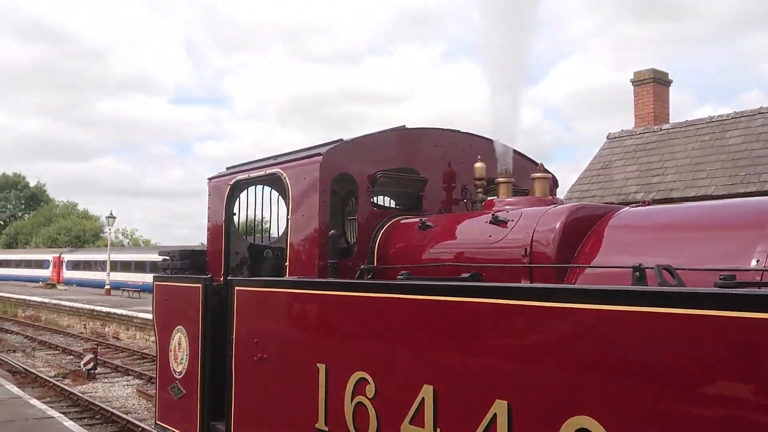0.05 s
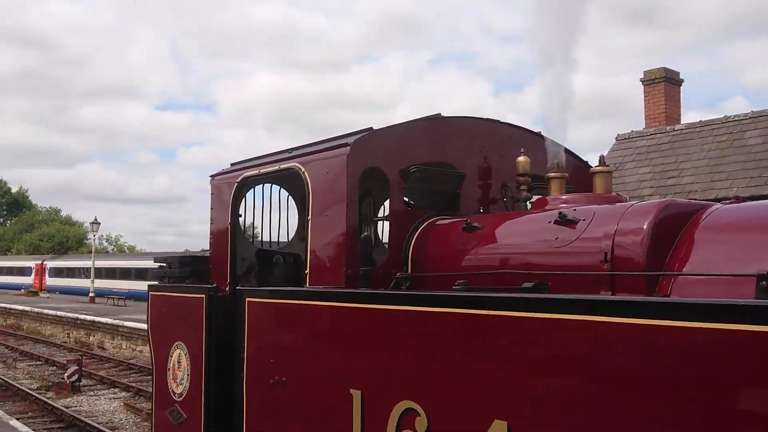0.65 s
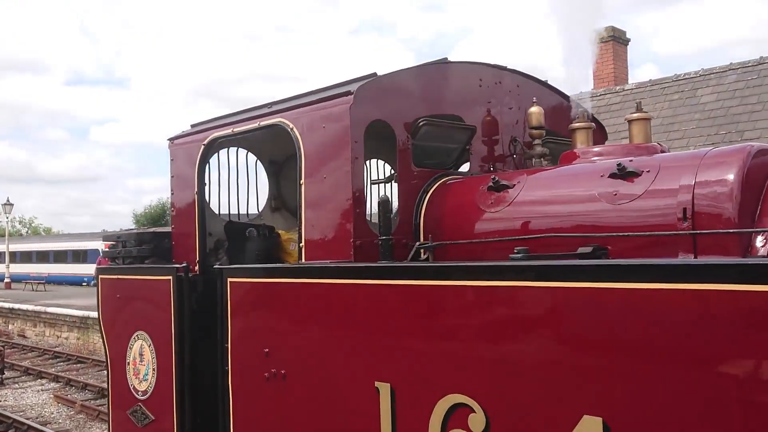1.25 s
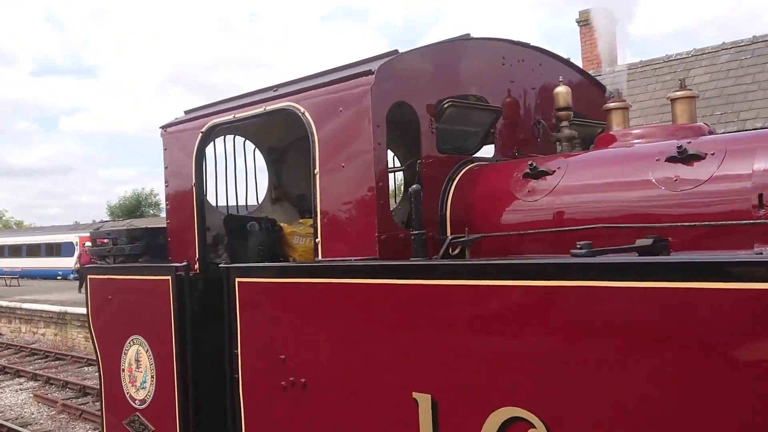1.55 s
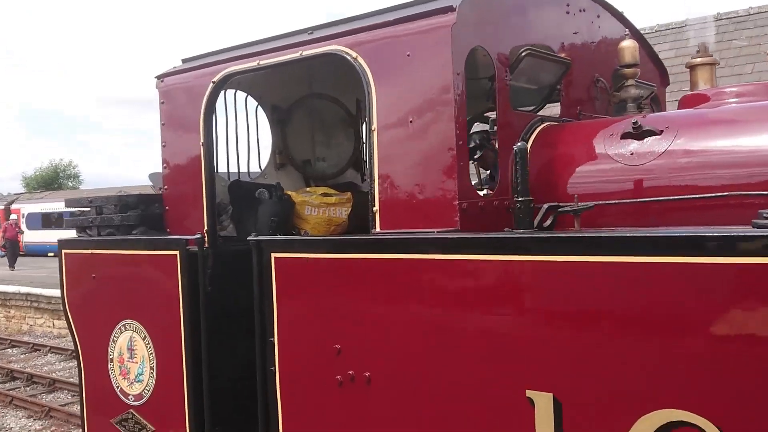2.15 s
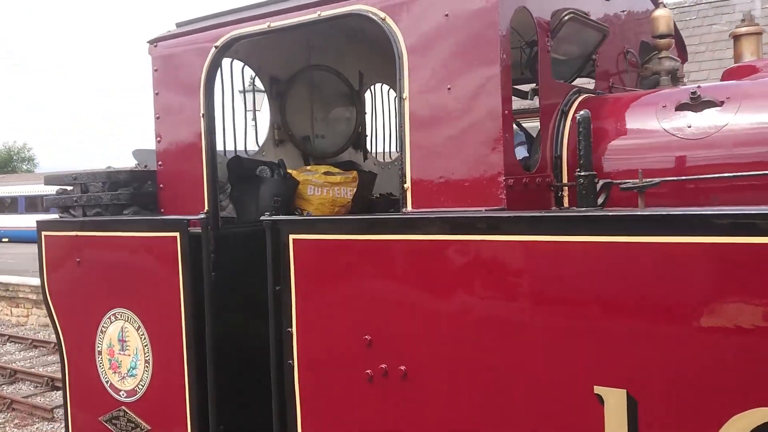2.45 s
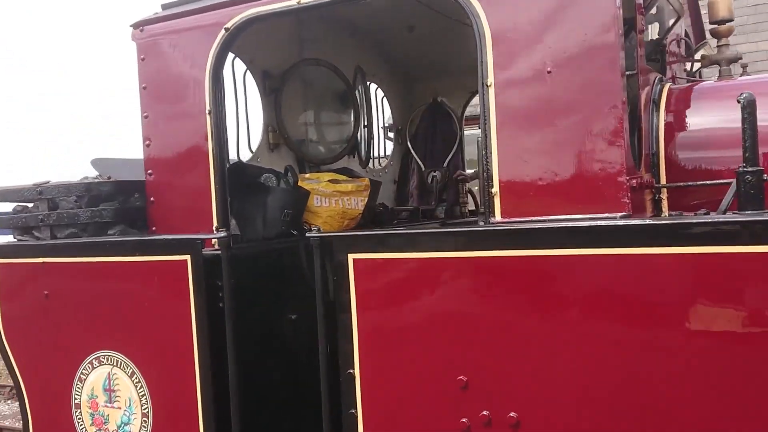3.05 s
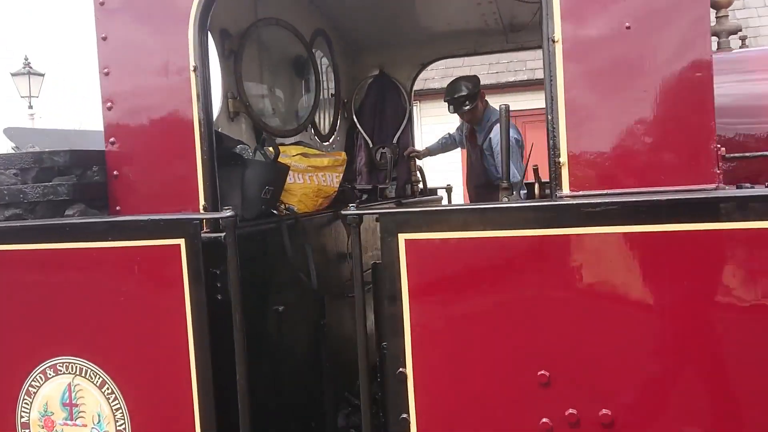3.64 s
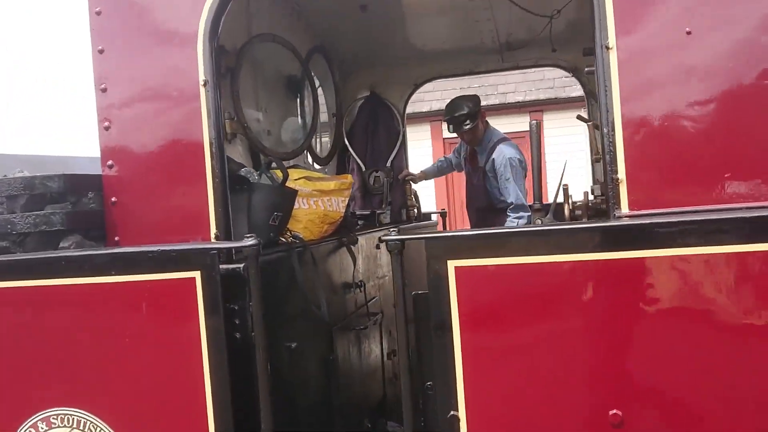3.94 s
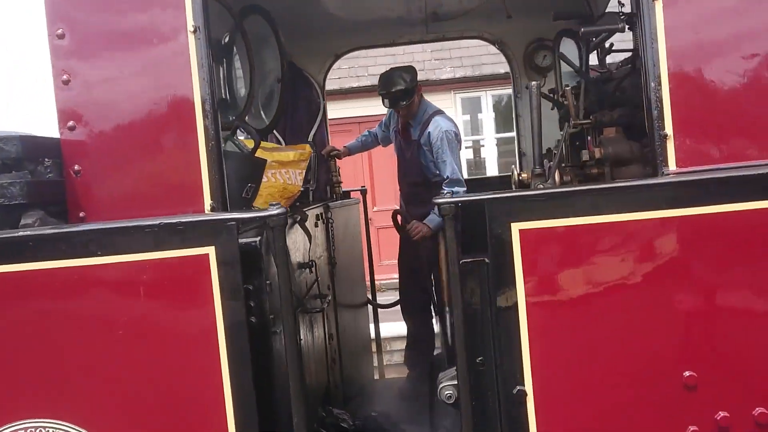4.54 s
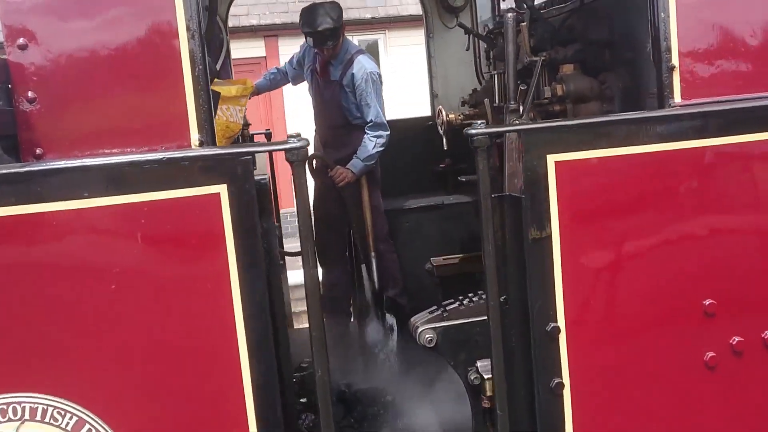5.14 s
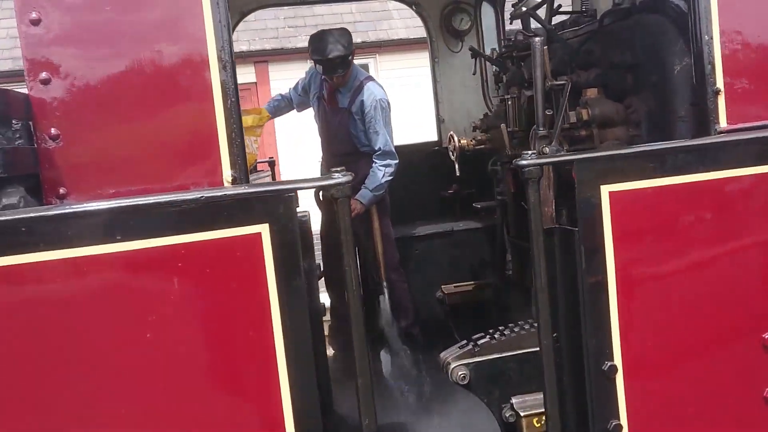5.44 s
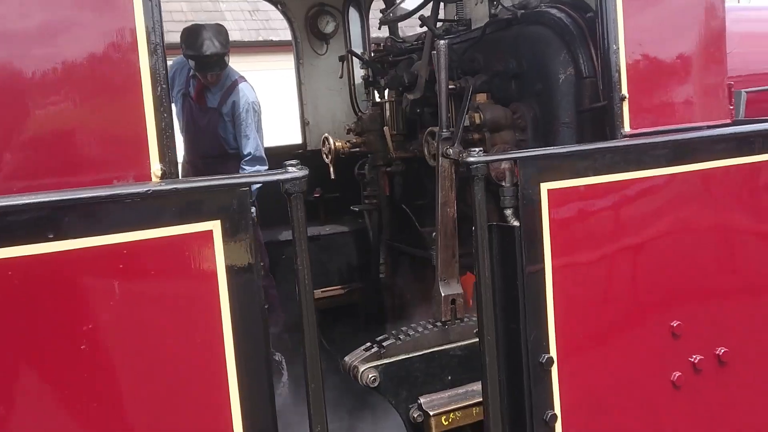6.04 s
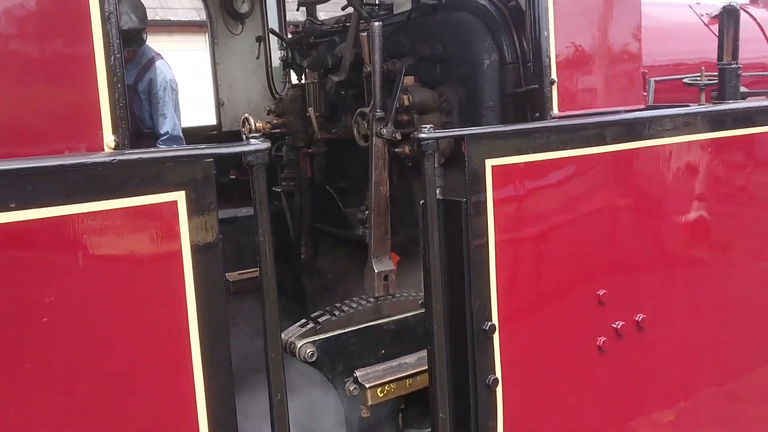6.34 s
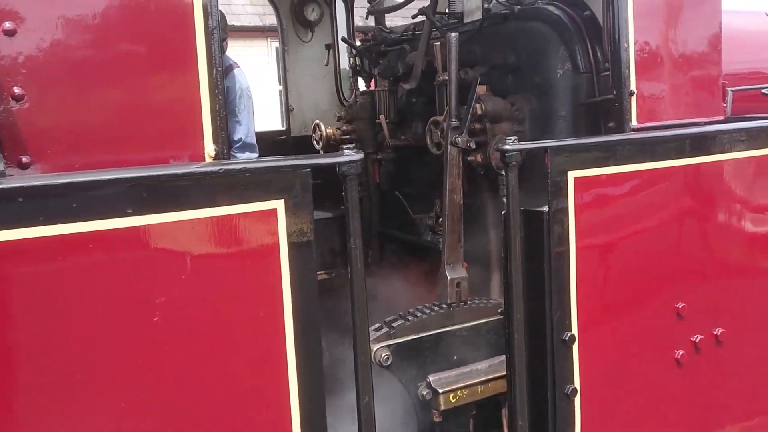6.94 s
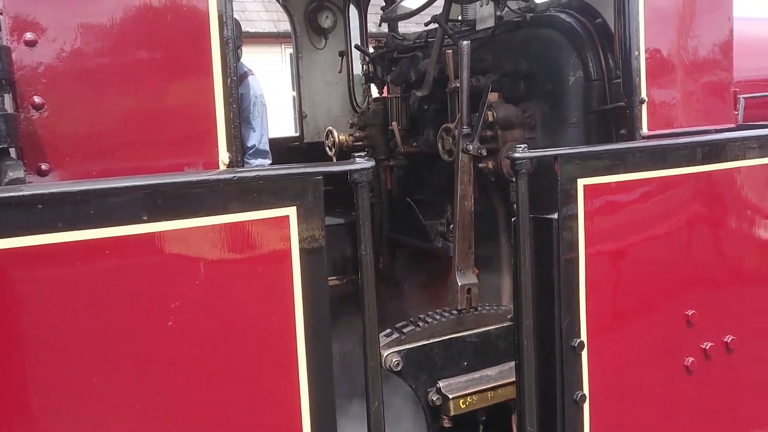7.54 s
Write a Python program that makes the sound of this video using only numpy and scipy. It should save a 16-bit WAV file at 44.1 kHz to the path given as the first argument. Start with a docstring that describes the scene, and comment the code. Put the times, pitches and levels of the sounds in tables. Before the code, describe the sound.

Steam hisses continuously from a locomotive's safety valves, joined about halfway by a lower rush of steam and water from the cab.

```python
"""A standing steam locomotive blows off its safety valves, heard on a hand-held stereo microphone.
From the first step the jet hisses over the firebox rumble, and a little wind touches the microphone.
On the walk to the cab, faint echoes comb the hiss, single bands swell or fade, and at times it whistles.
Near 4.6 s the doorway opens up a lower rush from the footplate and more of the fire. From about 6 s
the cab walls close in and ring, and the cab side half hides the rush while the valves blow on."""
import sys
import numpy as np
from scipy import signal
from scipy.fft import rfft, irfft, next_fast_len
from scipy.io import wavfile
from scipy.ndimage import uniform_filter1d

SR = 44100
rng = np.random.default_rng(int(sys.argv[2]) if len(sys.argv) > 2 else 0)


def to_wav(s):
    """Save 16-bit WAV."""
    ch = np.atleast_2d(s).T  # columns
    pcm = np.round(np.clip(ch, -1, 1) * 32767)  # PCM
    wavfile.write(sys.argv[1], SR, pcm.astype(np.int16))


N = 343539
PORT_GAP_M, EDGE_HZ = 0.06, 15790  # the microphone: distance between its two ports, top of its band
SOUND_M_PER_S = 343
DOOR_OPENS_S, DOOR_FADE_S = 4.6, 0.28  # the cab doorway comes into view


def gain_of(db):
    """Decibels to amplitude."""
    return 10 ** (np.asarray(db) / 20)


def port_column(pair):
    """A left and a right value, shaped to spread over time and frequency."""
    return np.array(pair)[:, None, None]


def grid(size):
    """Times (a column) and frequencies (a row) of short-time spectra."""
    hop = size // 4
    return np.arange(-(-N // hop) + 1)[:, None] * hop / SR, np.fft.rfftfreq(size, 1 / SR)


def curves(rows, t):
    """The columns of a timed table, read at the times t."""
    times, *columns = np.transpose(rows)
    return [np.interp(t, times, column) for column in columns]


def colour(points, hz):
    """A spectrum as gains, scaled to unit power below the band edge."""
    f, db = np.transpose(points)
    gain = gain_of(np.interp(np.log(hz + 1), np.log(f), db))
    return gain / np.sqrt(np.mean(gain ** 2 * (hz < EDGE_HZ)))


def bell(x, centre, half_width):
    """A smooth bump of height 1."""
    return np.exp(-((x - centre) / half_width) ** 2)


def fade_in(t, middle_s, half_s):
    """A smooth step from 0 to 1."""
    return (1 + np.tanh((t - middle_s) / half_s)) / 2


def wander(t, slow_hz, fast_hz, count=16):
    """Random drift of rms 1 between two rates."""
    rates = np.geomspace(slow_hz, fast_hz, count)
    waves = sum(np.sin(2 * np.pi * (r * t + rng.random())) / np.sqrt(r) for r in rates)
    return waves / np.sqrt(np.sum(1 / rates) / 2)


def patches(t, hz, frames, bins):
    """Smooth random field of rms 1 over time and frequency."""
    field = rng.standard_normal((len(t), len(hz)))
    for _ in range(2):
        field = uniform_filter1d(field, frames, axis=0)
        field = uniform_filter1d(field, bins, axis=1)
    return field / field.std()


def diffuse(hz, likeness=0.92):
    """Likeness at the two ports of sound that reaches the microphone from all sides."""
    return likeness * np.sinc(2 * hz * PORT_GAP_M / SOUND_M_PER_S)


def stereo_noise(gain, likeness, size):
    """Noise with a gain and a complex left-right likeness for each frame and bin."""
    framing = dict(nperseg=size, noverlap=size - size // 4)
    white = rng.standard_normal((2, N))
    right, unrelated = signal.stft(white, **framing)[2].transpose(0, 2, 1)
    left = likeness * right + np.sqrt(np.maximum(1 - abs(likeness) ** 2, 0)) * unrelated
    spectra = (np.array([left, right]) * gain).transpose(0, 2, 1)
    return signal.istft(spectra, **framing)[1][:, :N]


# wind right at the microphone: f/Hz, relative level/dB
WIND_SPECTRUM = [(20, -18), (60, -3), (130, -8.5), (220, -23), (500, -17), (2000, -60)]
# puffs on the way: t/s, half length/s, left level/dB, right level/dB
WIND_PUFFS = [(0.056, 0.03, -33, -60), (1.8, 0.3, -42.5, -45), (2.38, 0.07, -44, -58),
              (3.094, 0.18, -50, -43), (4.98, 0.09, -43, -47), (5.494, .09, -38, -39),
              (5.75, 0.09, -38, -41), (7.05, 0.067, -39, -49), (7.6, .18, -52, -49)]


def wind(size=2048, breeze_db=-53):
    """A faint breeze and soft puffs brush the microphone, unrelated at its two ports."""
    t, hz = grid(size)
    puffs = sum(port_column(gain_of(db)) * bell(t, s, half_s) for s, half_s, *db in WIND_PUFFS)
    return stereo_noise(colour(WIND_SPECTRUM, hz) * (gain_of(breeze_db) + puffs), 0, size)


# rumble of the firebox, from outside the cab: f/Hz, relative level/dB
FIRE_SPECTRUM = [(20, -34), (32, -26), (48, -11.5), (57, 3), (64, 5), (72, -1), (90, -5.5), (130, -19),
                 (400, -62)]
# the fire flares: t/s, half length/s, rise/dB
FIRE_FLARES = [(3.05, 0.14, 7), (5.75, 0.13, 7), (7.6, 0.5, 3)]


def firebox(size=8192, likeness=0.99, behind_tank_db=-49.5, doorway_db=-41, draught_db=0.5):
    """The draught through the fire booms in one low resonance, louder at the doorway."""
    _, hz = grid(size)
    t = np.arange(N) / SR
    level_db = behind_tank_db + (doorway_db - behind_tank_db) * fade_in(t, DOOR_OPENS_S, DOOR_FADE_S)
    level_db += sum(db * bell(t, s, half_s) for s, half_s, db in FIRE_FLARES)
    level_db += draught_db * wander(t, 1.6, 5.4, count=6)
    return stereo_noise(colour(FIRE_SPECTRUM, hz), likeness, size) * gain_of(level_db)


def cab_hollow(t, hz, spacing_hz=630, first_hz=60, cab_db=2.5, notch_hz=438, notch_db=-5.5):
    """Evenly spaced low resonances set in as the microphone nears the steel walls of the cab."""
    depth_db = cab_db * fade_in(t, 5.94, 0.26)
    ripple = np.cos(2 * np.pi * (hz - first_hz) / spacing_hz) * bell(hz, 950, 950)
    bounce_db = notch_db * bell(hz, notch_hz, 28)  # a bounce off the ground cancels one narrow band
    return gain_of(depth_db * ripple + bounce_db)


# the rush from the footplate: f/Hz, relative level/dB
RUSH_SPECTRUM = [(30.0, -20), (80.0, -12.5), (170.0, -0.5), (500.0, -3), (700, -2), (830, -3.5),
                 (1000, -5.8), (1300, -4.5), (2000.0, -5), (5000.0, -7.5), (15000.0, -50)]


def footplate(size=2048, far_db=-49, near_db=-42.3, doorway_db=-25.3, hidden_db=-30.5,
              surge_db=0.3, roar_db=4):
    """Steam and water rush over the footplate: far off at first, then close through the doorway."""
    t, hz = grid(size)
    level_db = np.interp(t, [0, DOOR_OPENS_S], [far_db, near_db])
    level_db += (doorway_db - near_db) * fade_in(t, DOOR_OPENS_S, DOOR_FADE_S)
    level_db += (hidden_db - doorway_db) * fade_in(t, 6.2, 0.04)  # the cab side half hides it
    level_db += surge_db * wander(t, 1.8, 14)
    # straight in front of the doorway the cab gives the rush a hollow roar
    roar = gain_of(roar_db * bell(t, 5.76, 0.3) * bell(hz, 760, 280))
    gain = colour(RUSH_SPECTRUM, hz) * gain_of(level_db) * roar * cab_hollow(t, hz)
    return stereo_noise(gain, diffuse(hz), size)


# colour of the hiss close to the cab walls: f/Hz, half width/Hz, left/dB, right/dB
CAB_BANDS = [(540, 45, 7.5, 6), (1350, 31, 5, 4.5), (1760, 89, 5, 2), (2020, 150, 3, -1),
             (2470, 350, -2, -5), (3400, 930, 1.5, -1), (4230, 170, 2.5, 2.2), (6300, 520, 0, -6),
             (8250, 650, 1, -2), (9250, 1200, 0.2, -4)]
# single bands of the hiss swell or fade for a while at each port:
# from t/s, to t/s, f/Hz, half width/Hz, left/dB, right/dB
HISS_BAND_SWELLS = [(-0.3, 1.83, 4200, 1900, -2.5, -0.8), (-0.3, 1.2, 13000, 2000, -2, -0.8),
                    (-0.3, 0.9, 15600, 900, 0, -3.5), (-0.3, 0.45, 1000, 70, -3, -4),
                    (-0.3, 2.4, 370, 70, -2, -1), (0.7, 1.37, 10600, 1500, -1, -3),
                    (1.45, 2, 10500, 1400, 2, 1), (1.7, 3.9, 730, 160, 1.5, 2),
                    (1.6, 2.8, 1150, 220, 3, 0.5), (1.9, 2.8, 4400, 1200, -0.7, -1.5),
                    (2.2, 2.95, 14800, 1700, 2, -1.5), (2.2, 2.75, 2400, 350, 0, -1.2),
                    (4.05, 4.6, 650, 200, -1.5, -2.5), (2.7, 4.3, 1060, 120, 3.5, 1),
                    (2.7, 4.4, 1490, 130, 6, 3.5), (3.35, 4.5, 15400, 900, 5, 3),
                    (3.7, 4.25, 4400, 2000, 2, 1), (4.4, 6.6, 13200, 800, -0.5, 3.5),
                    (5.7, 6.95, 14300, 2000, 1.5, 1), (5.95, 6.42, 13900, 1300, 1.5, 3),
                    (6.08, 6.9, 11700, 1200, 4.5, -1), (6.42, 6.95, 8900, 600, 2.8, 1.2),
                    (6.3, 7, 5440, 700, -2, -2.5), (6.4, 7.0, 9900, 400, -3, -1),
                    (6.4, 7.0, 11400, 1100, -1.5, -1.5), (6.68, 7.2, 12100, 1190, 2, 0),
                    (6.9, 8.1, 2780, 130, -1, -3), (6.9, 7.4, 3220, 160, 3, 1),
                    (7.0, 8.1, 14600, 1100, 1.5, 1.5), (7.0, 7.8, 10300, 1300, 0.5, -1.5),
                    (7.05, 8.1, 12600, 550, -1, -3.5), (7.08, 7.38, 15300, 650, 4.5, 6),
                    (7.15, 8.1, 4650, 948, 0.3, 5.5), (7.3, 9.1, 11000, 1000, 1.5, 2)]
# cab edges between jet and microphone: t/s, half length/s, left treble/dB, right treble/dB
EDGE_SHADOWS = [(3.13, .14, -1, -1), (5.29, 0.7, -4, -4.5), (7.15, 0.2, -1.5, -2.5)]


def walk_colour_db(t, hz, cab_s=6.17, approach_s=1, band_fade_s=0.097, shadow_hz=6000):
    """Along the walk the cab walls colour the hiss, single bands swell or fade, and edges dull it."""
    walls_db = sum(port_column(db) * bell(hz, f, width) for f, width, *db in CAB_BANDS)
    bands_db = walls_db * fade_in(t, cab_s, approach_s)
    for start, end, f, width, *db in HISS_BAND_SWELLS:
        swell = fade_in(t, start, band_fade_s) - fade_in(t, end, band_fade_s)
        bands_db += port_column(db) * swell * bell(hz, f, width)
    shadow_db = sum(port_column(db) * bell(t, s, half_s) for s, half_s, *db in EDGE_SHADOWS)
    return bands_db + shadow_db * (1 - bell(hz, 0, shadow_hz))


def near_echoes(t, hz, strength=0.19, shortest_s=0.003, longest_s=0.009, drift=0.0609, count=5):
    """Faint echoes off the nearby tank, cab and platform comb the hiss; their paths drift on the walk."""
    echo = strength * (1 - bell(hz, 0, 1100))  # long waves pass these surfaces by
    paths = 1
    for delay_s in np.geomspace(shortest_s, longest_s, count):
        side_s = port_column([-1, 1]) * rng.uniform(-1, 1) * PORT_GAP_M / SOUND_M_PER_S / 2
        late_s = delay_s * (1 + drift * wander(t, 0.076, 0.9)) + side_s
        paths = paths + echo * np.exp(2j * np.pi * (rng.random() - hz * late_s))
    return abs(paths) / np.sqrt(1 + count * echo ** 2)


# a ring in the hiss, narrowing on the walk, lower and wider by the cab: t/s, f/Hz, half width/Hz, rise/dB
RING_TRACK = [(0, 2070, 260, 3.5), (0.7, 2100, 260, 0), (0.85, 2170, 200, 0.5), (1.12, 2120, 202, 2),
              (1.45, 2080, 210, 1.5), (2.4, 1980, 140, 0.5), (3.15, 2020, 130, 3.5), (4.0, 2030, 120, -0.5),
              (4.7, 2000, 100, 1.5), (5.45, 2070, 110, 1.5), (6.1, 2090, 150, 0.5), (6.55, 1910, 230, 2.5),
              (7.79, 1860, 190, 2.5)]
# its whistles: t/s, half length/s, f/Hz, rise/dB
RING_WHISTLES = [(0.87, 0.1, 2160, 5.5), (1.1, 0.07, 2110, 3.5), (1.32, 0.11, 2010, 5),
                 (1.998, 0.2, 2060, 5), (4.95, 0.35, 2007, 3), (5.548, 0.33, 2080, 4.5),
                 (6.15, 0.12, 2070, 4)]


def jet_ring_db(t, hz, drift_hz=20, spurt_db=0.4, whistle_half_width_hz=60):
    """A hollow resonance in the hiss comes in spurts and at times tightens into a breathy whistle."""
    ring_hz, half_width_hz, rise_db = curves(RING_TRACK, t)
    ring_hz += drift_hz * wander(t, 0.574, 1.0)
    rise_db += spurt_db * wander(t, 10, 24)
    whistles_db = sum(db * bell(t, s, half_s) * bell(hz, f, whistle_half_width_hz)
                      for s, half_s, f, db in RING_WHISTLES)
    return rise_db * bell(hz, ring_hz, half_width_hz) + whistles_db


def port_beam_db(bearing, hz, axis_deg=64, half_width_deg=32, on_axis_db=8.5, left_share=0.25):
    """Top treble rises, mostly on the right, when the jet lies on the axis of the right port."""
    aim_db = on_axis_db * bell(bearing, axis_deg, half_width_deg)
    return port_column([left_share, 1]) * aim_db * np.minimum(hz / EDGE_HZ, 1) ** 4


# hiss of the valve jet: f/Hz, relative level/dB
JET_SPECTRUM = [(30, -23), (110, -18), (160, -11), (210, -8.5), (280, -14.5), (350, -10), (440, -11),
                (540, -11.5), (690, -6.5), (960, -10.5), (1300, -5), (2000, -0.5), (3500, 1.08),
                (6000, -0.9), (15500, -0.78)]
# its loudness along the walk, before colouring: t/s, level/dB
JET_LEVELS = [(0, -14), (.28, -12.5), (.65, -11.5), (1.05, -12), (1.38, -13.5), (1.7, -14.5), (2.25, -15.3),
              (3.08, -17), (4.0, -16.5), (4.65, -19.5), (5.0, -16), (5.8, -11), (6.17, -14), (6.42, -13.5),
              (6.8, -13), (7.1, -14.5), (7.45, -13.5), (7.79, -14)]
# the valves from the microphone: t/s, bearing to the right/deg, direct share of the hiss/0-1
VALVE_BEARINGS = [(0, -7, 0.54), (1.15, -2, 0.26), (1.7, 15, 0.54), (2.3, 26.5, 0.32), (2.75, 46.5, 0.55),
                  (3.5, 47, 0.92), (3.93, 58, 0.69), (4.35, 52, 0.63), (4.8, 46, 0.3), (5.4, 39, 0),
                  (6.2, -6, 0.24), (6.6, -29, 0.1), (7.0, -1, .2), (7.79, 10, 0.21)]


def safety_valves(size=2048, bend_hz=507, bent_db=-15, trim_db=0.09,
                  flutter_db=0.34, eddy_db=0.65, step_db=0.42, treble_scatter=0.25):
    """The turbulent steam jet hisses; part reaches the moving microphone directly, the rest scattered."""
    t, hz = grid(size)
    level_db, = curves(JET_LEVELS, t)
    bearing, direct = curves(VALVE_BEARINGS, t)
    # long waves bend round the cab, so the bass stays near one level
    level_db = level_db + (bent_db - level_db) * bell(hz, 0, bend_hz)
    db = level_db + trim_db + walk_colour_db(t, hz) + port_beam_db(bearing, hz) + jet_ring_db(t, hz)
    db += flutter_db * wander(t, 11, 24) * np.sqrt(hz / EDGE_HZ)  # the swaying plume flutters the treble
    db += eddy_db * patches(t, hz, frames=4, bins=80)  # eddies in the plume make the hiss shimmer
    # walking recolours each port
    db += step_db * np.array([patches(t, hz, frames=47, bins=28) for _ in range(2)])
    gain = colour(JET_SPECTRUM, hz) * gain_of(db) * near_echoes(t, hz) * cab_hollow(t, hz)
    # fittings and edges scatter short waves out of the direct path
    direct = np.clip(direct * (1 - treble_scatter * hz / EDGE_HZ), 0, 1)
    lag_s = PORT_GAP_M * np.sin(np.radians(bearing)) / SOUND_M_PER_S
    likeness = direct * np.exp(-2j * np.pi * hz * lag_s) + (1 - direct) * diffuse(hz)
    return stereo_noise(gain, likeness, size)


def scene():
    """All sources as they arrive at the two ports of the microphone."""
    return safety_valves() + footplate() + firebox() + wind()


# cavity resonances and notches of each microphone port: f/Hz, half width/Hz, level/dB
LEFT_PORT_BANDS = [(1710, 500, -3), (2880, 950, -2), (7850, 430, -5.5)]
RIGHT_PORT_BANDS = [(1500, 114, 2), (2000, 357, 4.5), (2535, 210, 3), (6300, 600, 4), (7950, 820, -4.5),
                    (7900, 280, -3), (9660, 1640, 3), (14900, 2000, 2)]
# phase between the ports: f/Hz, lead of the left/rad
LEFT_LEAD = [(100, 0), (800, -0.05), (1100, -0.6), (1400, -1.4), (2000, -0.3), (2600, -0.1), (4500, -0.1),
             (6000, 0.75), (7300, 2.3), (8300, 1.1), (10000, 1.4), (12000, 0.8), (13500, -0.5),
             (15500, -0.7)]


def record(dry, mismatch_db=1.2, mismatch_hz=2500, low_cut_hz=32):
    """The hand-held microphone: each port adds its colour and phase, then come low cut and band limit."""
    size = next_fast_len(N + 4096)
    hz = np.fft.rfftfreq(size, 1 / SR)
    ports_db = np.array([sum(db * bell(hz, f, width) for f, width, db in port)
                         for port in (LEFT_PORT_BANDS, RIGHT_PORT_BANDS)])
    ports_db += np.outer([-1, 1], mismatch_db / (1 + (hz / mismatch_hz) ** 2))  # more bass on the right
    lead_rad = np.interp(hz, *np.transpose(LEFT_LEAD))
    phase_turn = np.exp(1j * np.outer([0.5, -0.5], lead_rad))
    heard = irfft(rfft(dry, size) * gain_of(ports_db) * phase_turn, size)[:, :N]
    low_cut = signal.butter(2, low_cut_hz, "highpass", fs=SR, output="sos")
    heard = signal.sosfilt(low_cut, heard)
    band_limit = signal.firwin(1023, EDGE_HZ, window=("kaiser", 8), fs=SR)
    return signal.oaconvolve(heard, band_limit[None], "same", axes=1)


dry = scene()
out = record(dry)
to_wav(out)
```